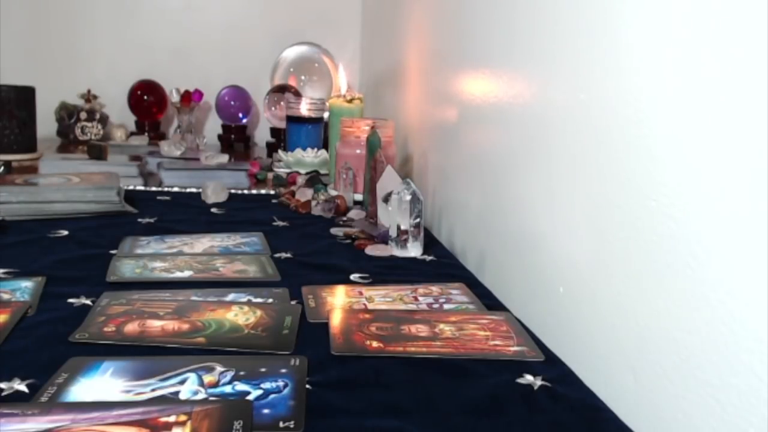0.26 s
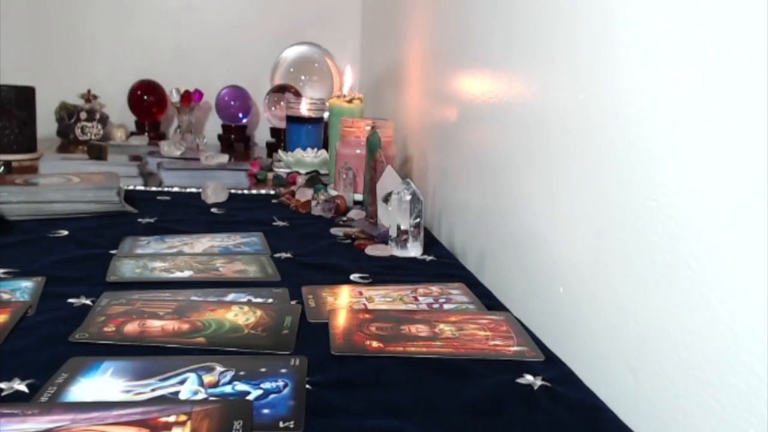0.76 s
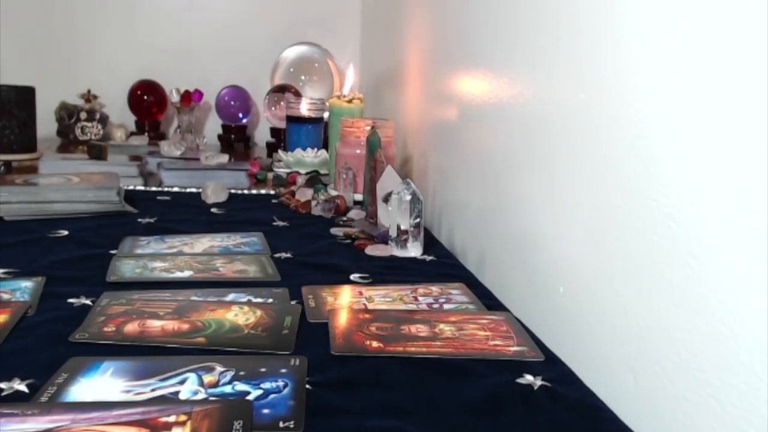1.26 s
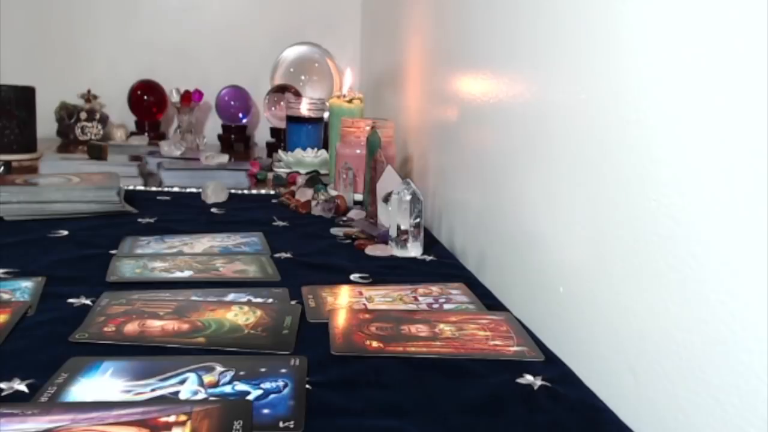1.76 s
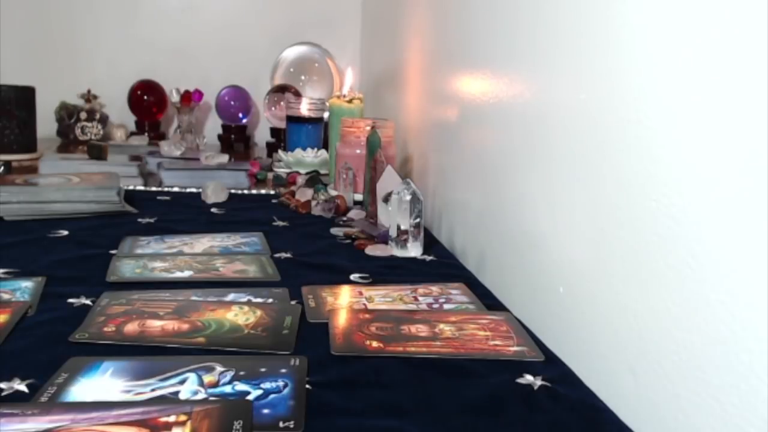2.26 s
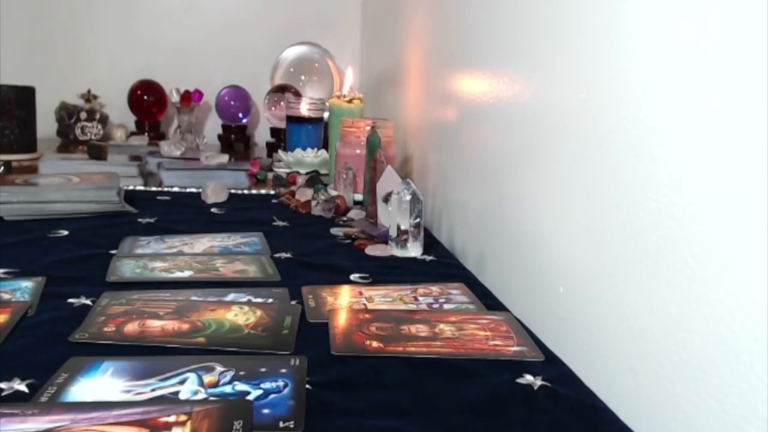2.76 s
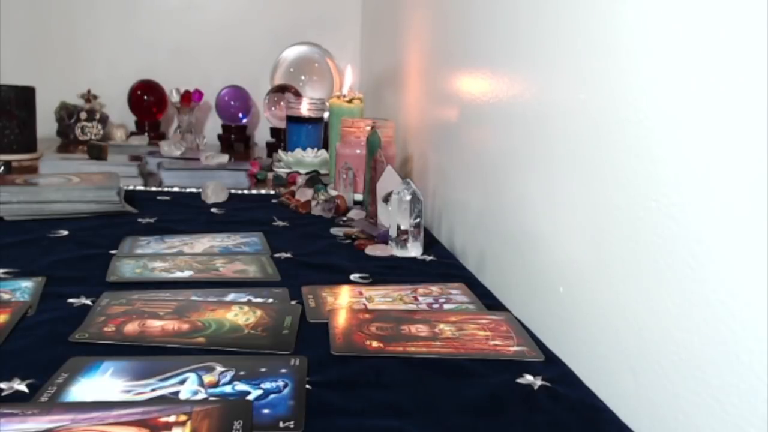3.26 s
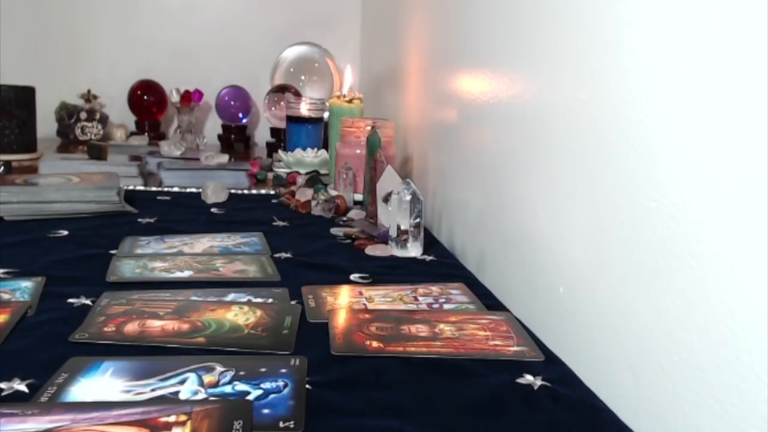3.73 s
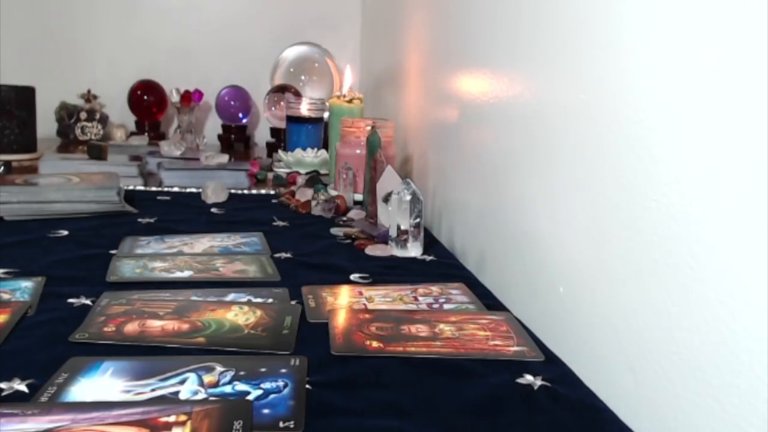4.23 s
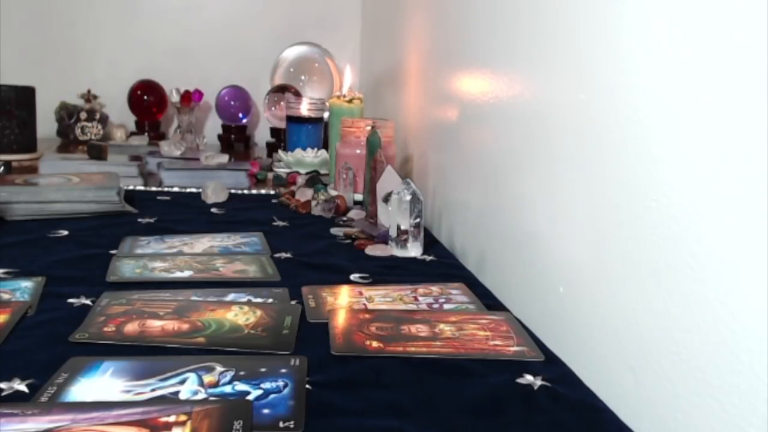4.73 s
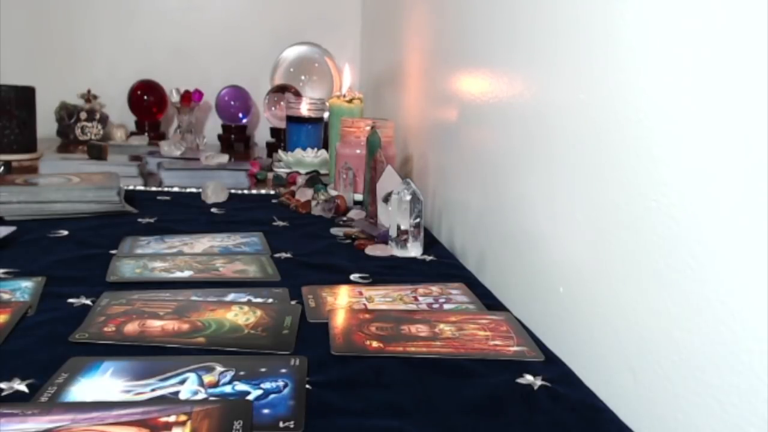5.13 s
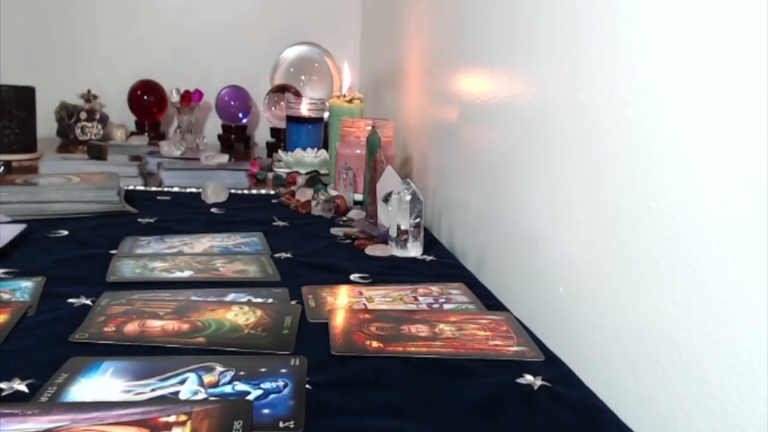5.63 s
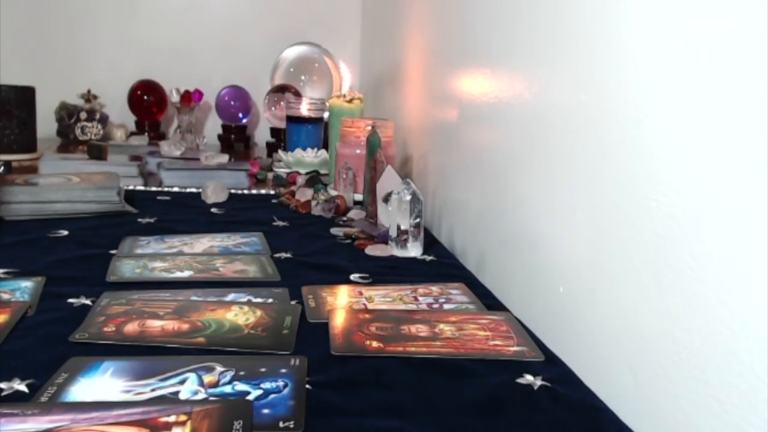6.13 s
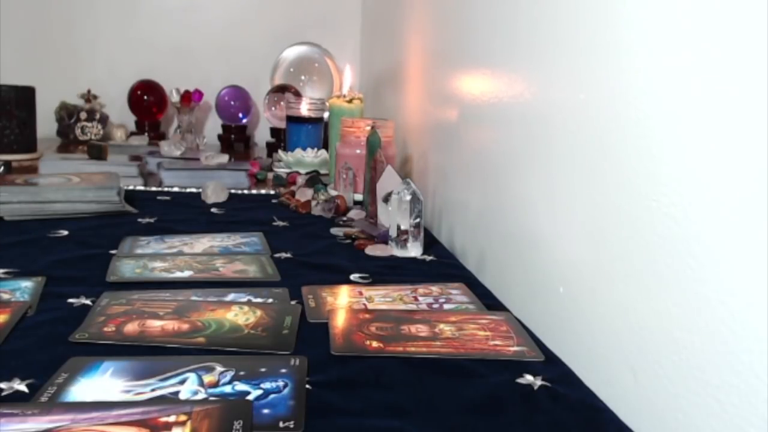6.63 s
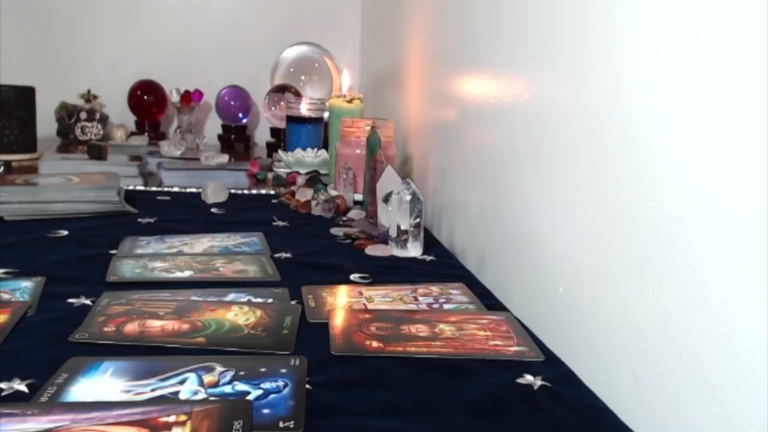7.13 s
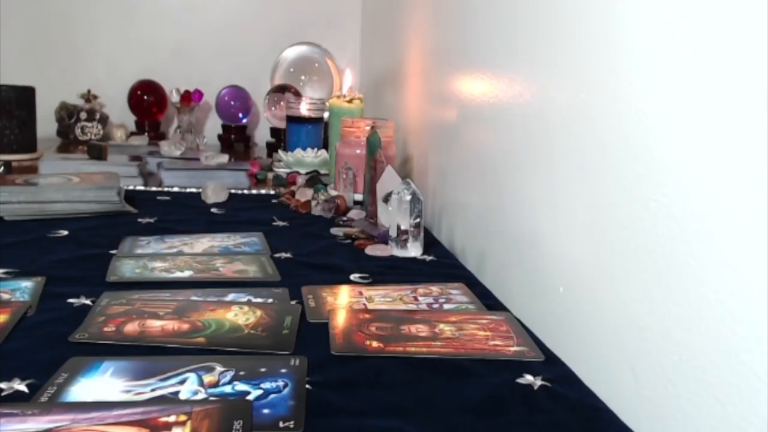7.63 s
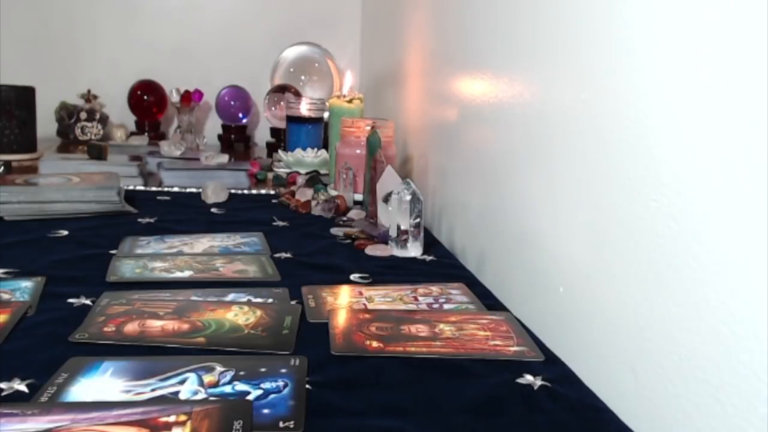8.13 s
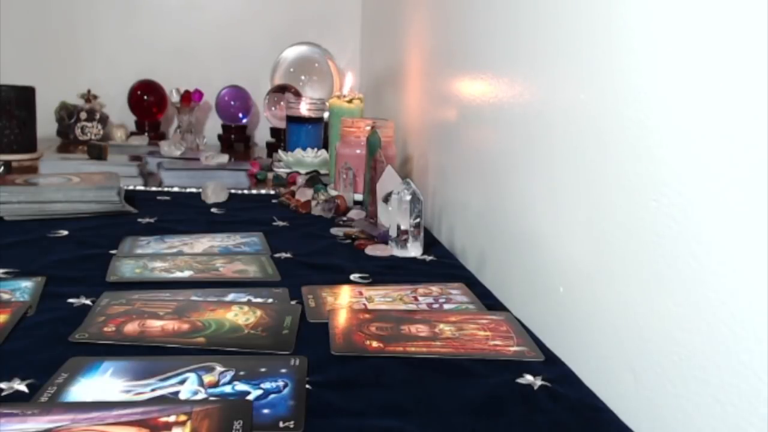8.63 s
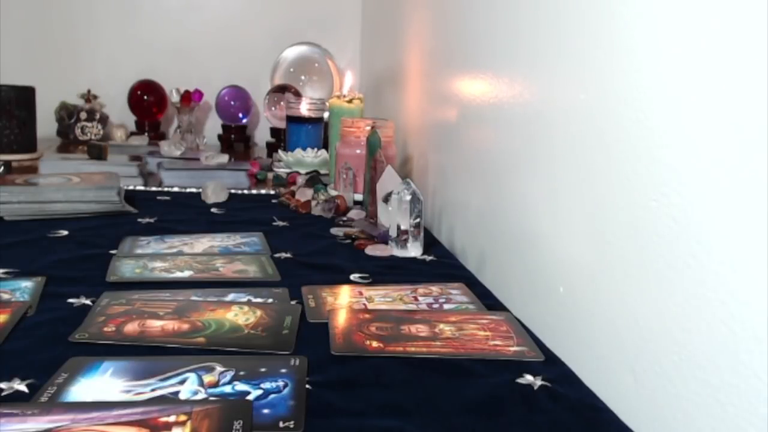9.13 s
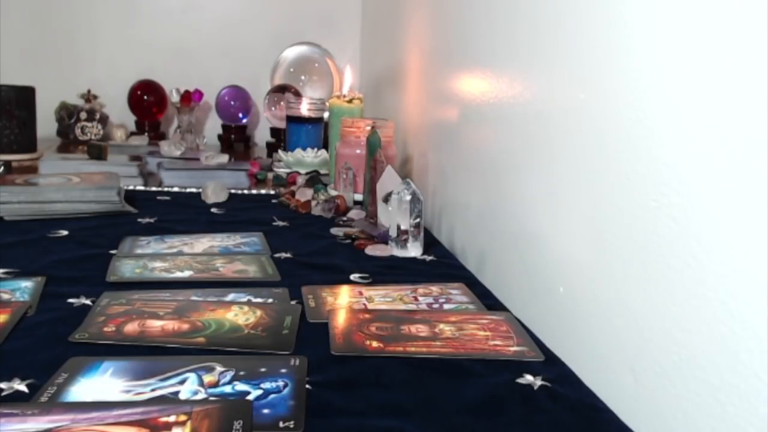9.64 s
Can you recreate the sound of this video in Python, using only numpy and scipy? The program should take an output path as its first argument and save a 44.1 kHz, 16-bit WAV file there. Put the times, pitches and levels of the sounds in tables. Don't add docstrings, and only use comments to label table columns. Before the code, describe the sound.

Stiff cards slap a cloth-covered table in firm thuds, then a fast hand shuffle hisses and snaps, followed by lighter taps and slides.

```python
import sys
import numpy as np
from scipy import signal
from scipy.fft import rfft, irfft
from scipy.io import wavfile
from scipy.ndimage import uniform_filter1d

SR = 44100
rng = np.random.default_rng(int(sys.argv[2]) if len(sys.argv) > 2 else 0)


def output_pcm(signal):
    pcm = np.clip(np.atleast_2d(signal).T, -1, 1) * 32767
    wavfile.write(sys.argv[1], SR, np.round(pcm).astype(np.int16))


def undo_db(level):
    steps = np.asarray(level, float) / 20
    return 10 ** steps


N = 436149

# pitch_hz, level_db
MOTOR_TONES = [(60.0, -61.5), (59.243, -67), (120.0, -72), (118.49, -77), (447, -74), (456, -77),
               (2998, -92)]
# pitch_hz, level_db (per Hz)
AIR_COLOUR = [(12, -33.5), (20, 4), (68, -4.5), (172, -16), (319, -21.5), (459, -14.5), (660, -30),
              (1570, -27.5), (2020, -37), (5850, -35.5), (16000, -40.5)]
# centre_hz, fall_60db_s, level_db
ROOM_BANDS = [(86, 0.37, -7), (240, 0.31, -3), (705, 0.33, -2), (2050, 0.27, 0), (5600, 0.29, 0),
              (13000, 0.22, -1)]
# start_s, peak_db, pitch_hz, fall_60db_s
NUDGES = [
    (.38, -49, 40, .3),
    (3.085, -44, 62.2, 0.36),
    (3.16, -46.5, 133.7, .3),
    (6.0, -53, 60.2, 0.17),
    (6.901, -46, 81.3, .3),
    (9.14, -37, 29.8, 0.53),
    (9.14, -37, 59.4, .25),
    (9.631, -36.5, 45, 0.34),
]
# pitch_hz, level_db, fall_60db_s
GLASS_RINGS = [(4716, -1, .42), (4765, -5, .35), (3714, 0, .36), (3050, -5, .12), (6557, -8, .3)]
# pitch_hz, level_db, fall_60db_s
TABLE_RINGS = [(71.7, -8, 0.42), (139.7, -4, 0.15), (198, -9.5, 0.099), (222.8, -7, 0.13), (273, -4, 0.1)]
# pitch_hz, level_db, fall_60db_s
BOARD_RINGS = [(431.3, -1.5, 0.31), (566, -2.5, 0.31), (631.4, -0.5, 0.22), (756, -5.5, 0.23),
               (860, -7, 0.3), (932, -9, 0.25), (1077, -20, 0.45), (1227, -13, 0.27), (1355, -2, 0.21),
               (1613, -5, 0.28), (1723, -15, 0.26), (1790, -20, 0.32)]
# pitch_hz, level_db (per Hz)
THUD_COLOUR = [(30, -44.5), (52, -19), (66, -3.5), (120, -2), (200, -4.5), (270, -3), (400, -30),
               (1200, -67.5)]
# pitch_hz, level_db (per Hz)
RUMBLE_COLOUR = [(15, -12.5), (30, -3), (60, -5), (120, -2), (220, -9), (400, -25), (1200, -73.5)]
# pitch_hz, level_db (per Hz)
DECK_COLOUR = [(130, -33.5), (230, -4), (300, -5), (380, -2), (500, -2), (600, -3), (800, -8.5),
               (1100, -22), (2500, -58.5)]
# pitch_hz, level_db (per Hz)
FLAP_COLOUR = [(400, -27), (750, -3.5), (950, 3), (1100, -2), (1300, 1.5), (1900, -1.5), (2330, -11.5),
               (3200, -23), (7000, -65)]
# pitch_hz, level_db (per Hz)
SLAP_COLOUR = [(1500, -15.5), (2300, 0.5), (3200, -2), (4600, -3.5), (6500, -14), (9000, -25), (16000, -46)]
# pitch_hz, level_db (per Hz)
EDGE_COLOUR = [(1180, -22.5), (2000, -6.5), (2550, -8), (3580, -7), (4080, -6), (4570, -3), (6310, -5.5),
               (6940, -10), (9830, -20), (13300, -25), (16000, -31)]
# time_s, grip_on_deck_db, wrists_on_table_db
HANDS = [(0, -65, -58), (.27, -86, -57.5), (.55, -67, -52.5), (.85, -71, -65), (2.5, -70.5, -58.5),
         (3, -68, -66), (3.3, -63, -59), (3.6, -73.5, -62), (4.4, -70, -54.5), (4.7, -50.5, -37),
         (5.0, -42.5, -36), (5.2, -76, -65), (5.65, -67, -52), (6.3, -71.5, -67.5), (8.3, -72.5, -65.5),
         (9.05, -57.5, -63), (9.42, -53, -43.5), (9.89, -59, -51)]
# peak_s, rustle_db
SETTLES = [
    (1.5, -53.5),
    (2.14, -52),
    (4.16, -52),
    (5.155, -55),
    (6.61, -46),
]
# top_speed_s, hiss_db, rise_20db_s, fall_20db_s, rustle_over_hiss_db
STROKES = [(.02, -57, 3, 0.05, 2), (.44, -51, 0.18, 0.11, -4), (.71, -57, 0.16, .1, -2),
           (.79, -58, 0.17, 0.15, -2), (.974, -42.5, 0.05, .09, -19.5), (1.59, -57.5, 1.08, 0.14, -6),
           (2.08, -55.5, 0.16, 0.14, -10), (2.975, -57, -0.1, 0.14, -7), (3.04, -54.5, 0.08, 0.14, -6.5),
           (3.46, -61, 0.5, 0.25, -1.5), (4.52, -34, .02, 0.22, -20), (4.665, -41, .1, .12, -12),
           (4.825, -32, 0.03, 0.1556, -14), (4.905, -36, .051, .11, -13), (4.995, -35, 0.041, 0.061, -9),
           (5.515, -58, .012, .11, -4), (5.565, -53.5, .031, 0.19, -4), (5.685, -59, .021, .19, -4),
           (5.76, -55, -0.2, 0.2, -5.5), (6.17, -42.5, 0.05, 0.09, -12), (6.69, -54.5, 0.45, 0.1, -8),
           (6.91, -48.5, -0.02, 0.13, -13), (8.05, -55.5, 0.16, .15, -3.5), (8.41, -45.5, 0.04, 0.12, -14),
           (8.66, -47, 0.09, 0.16, -3), (9.19, -53, 0.17, 0.46, -7), (9.32, -44.5, 0.18, 0.18, 1),
           (9.42, -50, -0.1, 0.02, -3.5)]
# top_speed_s, hiss_db, fall_20db_s
BRUSHES = [(1.84, -67, -4.5), (1.96, -65.5, 0.7), (2.269, -63, 0.1), (2.42, -61, .5), (2.54, -61.5, 0.07),
           (2.71, -64, 0.2), (2.86, -70.5, 9), (3.27, -72.5, -1.5), (3.83, -74, -0.2), (4.02, -68, 0.4),
           (4.31, -68, 0.5), (4.461, -56, .11), (5.881, -66.5, 0.25), (6., -49.5, 0.1), (6.42, -63.5, 0.69),
           (7.1, -57.5, 0.1), (7.25, -64, 0.2), (7.5, -74, 0.54), (7.91, -64.5, 0.4), (8.24, -71.5, -3),
           (8.325, -55, 0.8), (8.6, -54.5, 0.9), (8.93, -56.5, 0.15), (9.03, -55, -0.5), (9.59, -62, 0.8),
           (9.79, -61.5, 0)]
# start_s, peak_db, centre_hz, length_s
FLICKS = [(2.409, -38.5, 3200, 0.012), (4.874, -23, 6080, .005), (4.56, -37, 6460, 0.0033),
          (4.963, -21.5, 5320, .012), (5.042, -11.5, 4720, 0.017), (5.759, -30.5, 4600, 0.004),
          (6.527, -21.5, 3140, 0.014), (6.951, -31, 2550, 0.0071), (4.004, -40, 14000, .012),
          (.567, -50, 8300, .006), (8.109, -43, 8400, 0.014), (8.403, -29, 4400, 0.009),
          (8.651, -14.5, 3200, 0.0069), (1.298, -45, 10500, .022), (1.914, -54, 11500, .008),
          (6.492, -46, 11000, .02), (6.672, -54, 11000, .025), (4.515, -40, 13000, .015),
          (4.775, -34, 11000, .01), (4.83, -36, 11500, .015), (4.965, -35.5, 12500, .008),
          (5.049, -26, 12000, 0.013), (5.059, -12.5, 5800, .008), (8.304, -52.5, 10500, .03),
          (8.365, -46, 10000, .02), (8.581, -46, 12500, .01), (8.652, -41, 9000, .012),
          (9.157, -35, 5000, .006), (3.399, -50.5, 4500, .004), (3.46, -48, 4100, .004),
          (4.682, -36, 5500, .005), (4.93, -30, 6500, .012), (4.856, -26, 6000, .008),
          (2.2, -49, 4300, .006), (5.987, -33, 4700, .008)]
# start_s, flap_db, boom_db, knock_db, snap_db
LANDINGS = [(.197, -59, -44, -45.5, -78), (1.272, -21, -38, -26.5, -36), (1.278, -10, -22.5, -19.5, -43.5),
            (1.287, -10, -25, -16, -37.5), (1.297, -6, -16.5, -11.5, -28), (1.31, -16, -30, -22.5, -34),
            (1.342, -15, -31, -23.5, -37), (1.369, -17.5, -33.5, -23, -42), (1.402, -24.5, -37, -28, -47.5),
            (1.328, -10.5, -21.5, -18.5, -35.5), (1.356, -14.5, -30.5, -17, -38.5),
            (1.981, -23, -21, -15, -46.5), (1.996, -12.5, -15.5, -14, -51), (2.012, -19.5, -27, -20, -53),
            (2.035, -23.5, -30.5, -27.5, -53.5), (3.083, -51, -31, -43, -60), (3.988, -29, -20, -21, -64),
            (4.004, -12, -14, -4, -20.5), (4.012, -12, -22, -8, -26), (4.025, -17, -24, -10.5, -28),
            (4.039, -21, -27, -16, -32), (4.603, -29.5, -30, -29.5, -41), (5.441, -61, -44, -45, -70),
            (5.538, -38.5, -41, -55, -37.5), (6.471, -17, -34, -16, -37.5), (6.481, -10.5, -37, -11, -44.5),
            (6.489, -11, -30, -14, -42), (6.511, -12.5, -32, -20, -38), (6.552, -18.5, -34, -23.5, -40),
            (6.497, -7, -22, -14.5, -35), (6.53, -8.5, -25, -15.5, -35), (9.136, -56, -40.5, -40, -60),
            (9.148, -47, -39, -32.5, -43.5), (9.364, -45, -48, -37.5, -33.5), (9.634, -46, -38, -35, -55),
            (9.651, -48, -42, -38, -56), (9.826, -49, -37, -50.5, -68), (9.869, -67, -38, -44, -66)]
# start_s, flap_db, knock_db, snap_db
THROWS = [(4.49, -35, -40, -39), (4.527, -25, -32, -25), (4.501, -22, -33.5, -21.5), (4.518, -21, -28, -21),
          (4.552, -27, -32.5, -35), (4.638, -30, -26, -36), (4.733, -38, -36, -34), (4.771, -12, -20, -22),
          (4.79, -23, -30, -29), (4.83, -23, -32, -24.5), (4.878, -17, -28, -23), (4.893, -24, -34.5, -29),
          (4.781, -12.5, -22, -23.5), (4.801, -22, -30.5, -23.5), (4.821, -26, -32.5, -27),
          (4.869, -13.5, -26, -19), (4.967, -26.5, -30.5, -19.5), (4.99, -22, -31, -24),
          (5.034, -16, -21, -21), (5.04, -8, -22, -13), (5.048, -11, -26, -12), (5.058, -16, -31.5, -16),
          (5.069, -19, -36.5, -19), (5.086, -23, -38.5, -24), (4.58, -31, -34, -33.5),
          (4.66, -33, -34, -36.5), (4.7, -36, -38.5, -37)]
# start_s, flap_db, knock_db, snap_db
TAPS = [(0.365, -42, -54, -52), (0.378, -41, -53, -48), (0.643, -44, -55, -50), (0.915, -34, -52, -39),
        (1.824, -44, -51, -46.5), (2.383, -43.5, -56, -54.5), (2.403, -35, -46.5, -46.5),
        (5.502, -45, -56, -44), (5.758, -42.5, -45.5, -40.5), (5.982, -30, -50, -40),
        (5.991, -27.5, -47, -36.5), (6.11, -45, -48.5, -45), (6.873, -35, -47, -45),
        (6.947, -44, -47.5, -45), (8.031, -41.5, -49, -61), (8.112, -54.5, -50, -50.5),
        (8.304, -56, -46.5, -46), (8.363, -36.5, -35.5, -33), (8.402, -34.5, -63, -37),
        (8.581, -31, -34.5, -36), (8.593, -33.5, -36, -40), (8.61, -33.5, -39, -42), (8.66, -28, -43, -32),
        (8.903, -52, -52, -47), (8.651, -26.5, -40, -25.5), (8.865, -65, -46, -47.5),
        (9.006, -47.5, -50, -49), (9.057, -43, -40.5, -41.5), (9.185, -41, -35.5, -51),
        (9.197, -37, -35.5, -46), (9.228, -39, -47, -55), (9.271, -32, -40, -37), (9.283, -34, -42, -44),
        (9.3, -37, -43, -41), (9.4, -39, -39.5, -40), (9.577, -39, -51, -35)]
# start_s, flap_db, snap_db
TICKS = [(.242, -47, -52), (.558, -47.5, -45.5), (.7, -52, -54), (0.788, -47, -51.5), (1.676, -51, -61.5),
         (1.914, -67.5, -54), (2.842, -49, -59), (3.363, -55.5, -82.5), (3.398, -51, -52.5),
         (3.455, -46.5, -47.5), (4.329, -59.5, -62.5), (5.673, -42, -45.5), (6.212, -61.5, -58),
         (7.012, -42, -53), (7.211, -48, -57), (7.384, -49.5, -54), (7.882, -62.5, -59),
         (8.934, -45, -45.5)]


def unit(x):
    return x / np.sqrt(np.mean(x ** 2))


def colour(x, points):
    hz, db = np.transpose(points)
    grid = np.maximum(np.fft.rfftfreq(8192, 1 / SR), 1)
    level_db = np.interp(np.log(grid), np.log(hz), db, left=db[0] - 44.5, right=db[-1] - 37.5)
    cepstrum = irfft(np.log(undo_db(level_db)))
    cepstrum[1:4096] *= 2
    cepstrum[4097:] = 0
    response = irfft(np.exp(rfft(cepstrum)))[:4096]
    response = response / np.sqrt(np.sum(response ** 2))
    return signal.fftconvolve(x, response)[:len(x)]


def ring(modes):
    t = np.arange(SR // 2) / SR
    return sum(undo_db(db) * np.sin(2 * np.pi * hz * t) * 1000. ** (-t / t60) for hz, db, t60 in modes)


def shake_body(push, modes):
    body = ring(modes)
    return signal.fftconvolve(push, body / np.sqrt(np.sum(body ** 2)))[:N]


def walk(rate_hz):
    hold = int(SR / rate_hz)
    levels = np.repeat(rng.standard_normal(N // hold + 1), hold)
    return 1.165 * uniform_filter1d(levels, hold)[:N]


def grit(rough_db, rate_hz):
    return unit(rng.standard_normal(N) * undo_db(rough_db * walk(rate_hz)))


def background():
    t = np.arange(N) / SR - 0.14
    hum = 0
    for hz, db in MOTOR_TONES:
        hum = hum + undo_db(db + .8 * walk(3)) * np.sqrt(2) * np.cos(2 * np.pi * hz * t)
    air = colour(rng.standard_normal(N), AIR_COLOUR)
    return hum + undo_db(-63 + .8 * walk(3.6)) * air


def room(x, build_up_s=0.0022):
    t = np.arange(SR // 2) / SR
    tail = 0
    for hz, t60, db in ROOM_BANDS:
        band = signal.butter(2, [hz / 1.7, hz * 1.65], "band", fs=SR, output="sos")
        echoes = signal.sosfilt(band, rng.standard_normal(len(t)))
        tail = tail + undo_db(db) * echoes * 1000. ** (-t / t60)
    tail = tail * (1 - np.exp(-(t / build_up_s) ** 2))
    return x + undo_db(-29.5) * signal.fftconvolve(x, tail)[:N]


def nudges(push_s=0.016):
    out = np.zeros(N + SR)
    t = np.arange(SR // 2) / SR
    for s, db, hz, t60 in NUDGES:
        sway = ring([(hz, db, t60), (1.2 * hz, db + 1.5, t60)])
        out[int(s * SR):][:len(t)] += (1 - np.exp(-t / push_s)) * sway
    return out[:N]


def glass(start_s=4.006, level_db=-29.5):
    tick = np.zeros(N)
    tick[int(start_s * SR)] = undo_db(level_db)
    chatter = undo_db(2.5 * walk(90) - 7.5)
    return signal.fftconvolve(tick, ring(GLASS_RINGS))[:N] * chatter


def swells(s, db, rise_s, fall_s, round_s=.015):
    t = np.arange(0, N + 64, 64) / SR
    late = t[:, None] - s
    late = late * np.abs(late) / (np.abs(late) + round_s)
    before = -late / np.maximum(rise_s, .01)
    after = late / np.clip(fall_s, .01, .9)
    drop_db = 20 * np.where(late < 0, before, after)
    gain = np.sqrt(np.sum(undo_db(2 * (db - drop_db)), axis=1))
    return np.interp(np.arange(N) / SR, t, gain)


def strokes():
    brushes = [(s, db, 0.039, fall_s, -4) for s, db, fall_s in BRUSHES]
    s, db, rise_s, fall_s, rustle_db = np.transpose(list(STROKES) + brushes)
    hiss = np.hypot(swells(s, db, rise_s, fall_s), undo_db(-84))
    return hiss, swells(s, db + rustle_db, rise_s, fall_s)


def handling():
    s, grip_db, weight_db = np.transpose(HANDS)
    t = np.arange(N) / SR
    grip = undo_db(np.interp(t, s, grip_db))
    weight = undo_db(np.interp(t, s, weight_db))
    rub = strokes()[1]
    settle = swells(*np.transpose(SETTLES), rise_s=.11, fall_s=.17)
    rustle = np.hypot(rub, settle)
    creak = np.sqrt(grip ** 2 + (undo_db(-6.5) * rub) ** 2 + (undo_db(-4) * settle) ** 2)
    rumble = np.hypot(weight, undo_db(-2) * settle)
    return rustle, creak, rumble


def slide():
    hiss = 0
    for hz in 1200 * 1.6 ** np.arange(6):
        band = signal.butter(2, [hz, 1.6 * hz], "band", fs=SR, output="sos")
        catch = undo_db(1.6 * walk(25) + np.log2(hz / 4000))
        hiss = hiss + catch * signal.sosfilt(band, grit(2.2, 250))
    return colour(strokes()[0] * hiss, EDGE_COLOUR)


def flicks(width=0.29):
    out = np.zeros(N)
    t = np.arange(SR // 10) / SR
    for s, db, hz, run_s in FLICKS:
        band = signal.butter(2, [hz / (1 + width), hz * (1 + width)], "band", fs=SR, output="sos")
        burst = unit(signal.sosfilt(band, rng.standard_normal(len(t)))) * np.exp(-t / run_s)
        out[int(s * SR):][:len(t)] += undo_db(db - 7.5) * burst
    return out


def hits():
    rows = [(*row, 0.0094) for row in LANDINGS]
    rows += [(s, flap, knock - 13, knock, snap, 0.007) for s, flap, knock, snap in THROWS]
    rows += [(s, flap, knock - 11.5, knock, snap, 0.011) for s, flap, knock, snap in TAPS]
    rows += [(s, flap, flap - 15, flap - 18, snap, 0.011) for s, flap, snap in TICKS]
    return np.transpose(rows)


def contact(db, rise_s, lead_s=.002):
    force = np.zeros(N + SR)
    t = np.arange(SR // 4) / SR
    for (s, *_, run_s), power in zip(hits().T, undo_db(2 * db)):
        i = int((s - lead_s) * SR)
        run_s = np.clip(run_s, .001, .06)
        onset_s = rise_s * (run_s / 0.015) ** 2
        run = (1 - np.exp(-t / onset_s)) * np.exp(-t / run_s)
        force[i:i + len(t)] += power * run ** 2
    return np.sqrt(force[:N])


def table(boom_db, knock, rumble):
    thud = colour(undo_db(-2.5) * contact(boom_db, rise_s=0.0022) * grit(1.8, 200), THUD_COLOUR)
    boom = undo_db(-16) * shake_body(thud, TABLE_RINGS)
    damped = [(hz, db, np.clip(.3 * t60, .02, .3)) for hz, db, t60 in BOARD_RINGS]
    board = undo_db(-8) * shake_body(knock, damped)
    shake = colour(undo_db(-7) * rumble * grit(3.1, 15), RUMBLE_COLOUR)
    return thud + board + boom + shake


def edges(flap_db, knock_db, snap_db):
    flat = np.clip((np.maximum(flap_db, knock_db) - snap_db - 5.5) / 12, .01, .99)
    slap_db = snap_db + 10 * np.log10(flat)
    bright_db = snap_db + 10 * np.log10(1 - flat)
    slap = undo_db(0.5) * contact(slap_db, rise_s=0.003) * grit(7.7, 700)
    snap = undo_db(-3) * contact(bright_db, rise_s=0.0022) * grit(7, 600)
    return colour(slap, SLAP_COLOUR) + colour(snap, EDGE_COLOUR)


def cards():
    rustle, creak, rumble = handling()
    _, flap_db, boom_db, knock_db, snap_db, _ = hits()
    flap = undo_db(-3.5) * contact(flap_db, rise_s=0.0024) * grit(4, 500)
    flap = flap + undo_db(-3.5) * rustle * grit(1.8, 120)
    knock = undo_db(-.4) * contact(knock_db, rise_s=.0035) * grit(3.3, 300)
    knock = knock + undo_db(-5) * creak * grit(2.8, 60)
    deck = colour(flap, FLAP_COLOUR) + colour(knock, DECK_COLOUR)
    return deck + edges(flap_db, knock_db, snap_db) + table(boom_db, knock, rumble)


def scene():
    played = room(cards() + flicks())
    return (played + slide() + background() + nudges() + glass())[None]


def band_limit(x):
    return signal.sosfilt(signal.butter(12, 15800, fs=SR, output="sos"), x)


def record(dry):
    flat = dry / (1 + np.abs(dry / .6) ** 4) ** .25
    low_pass = signal.ellip(10, .2, 80, 15850, fs=SR, output="sos")
    mix = signal.sosfilt(low_pass, flat)
    return band_limit(mix)


dry = scene()
out = record(dry)
output_pcm(out)
```